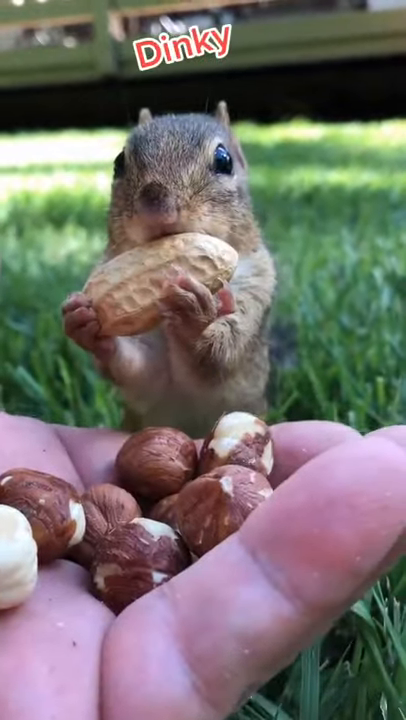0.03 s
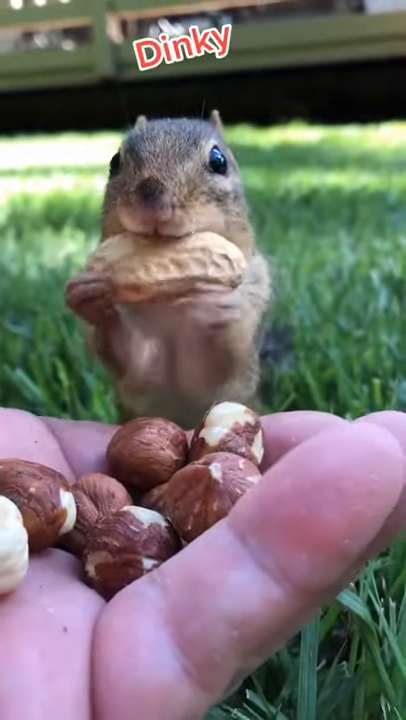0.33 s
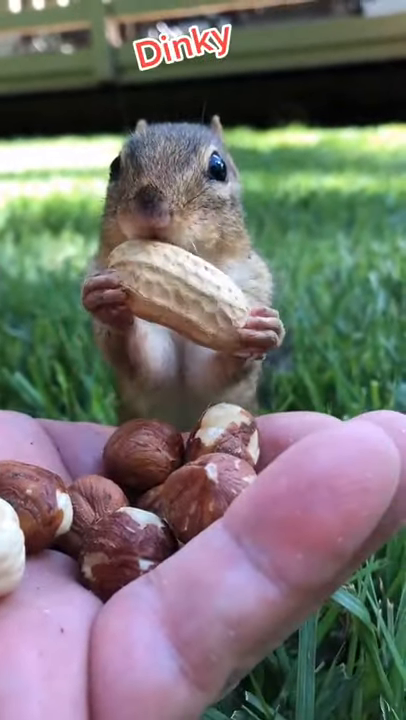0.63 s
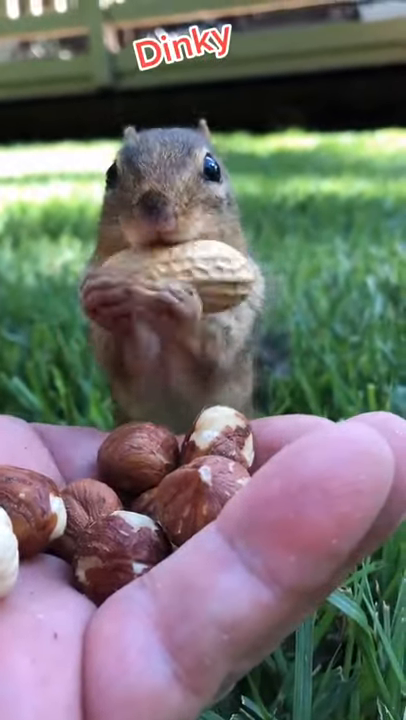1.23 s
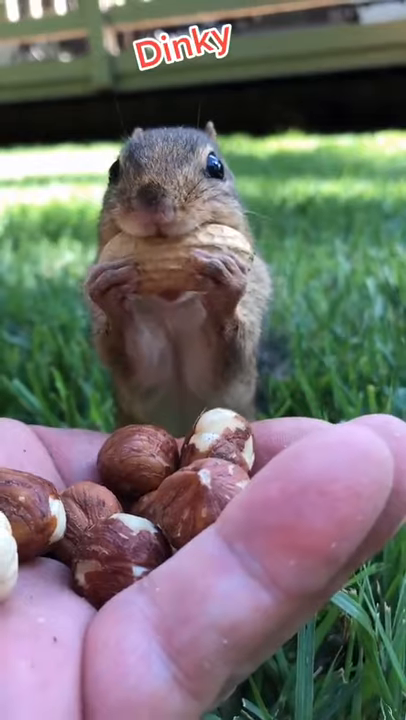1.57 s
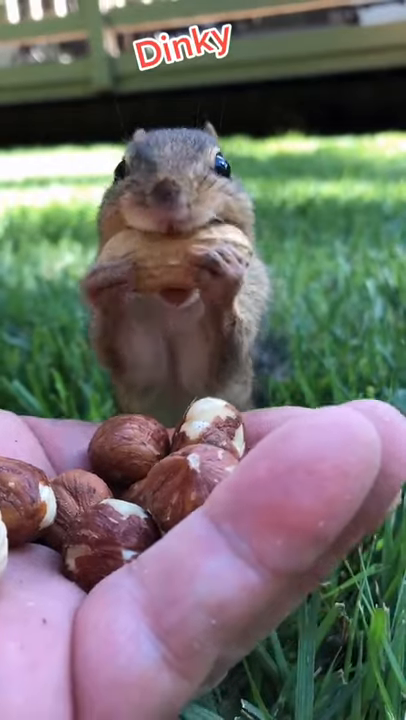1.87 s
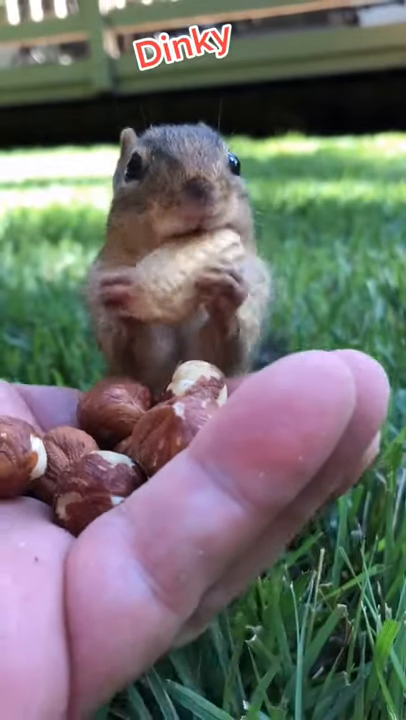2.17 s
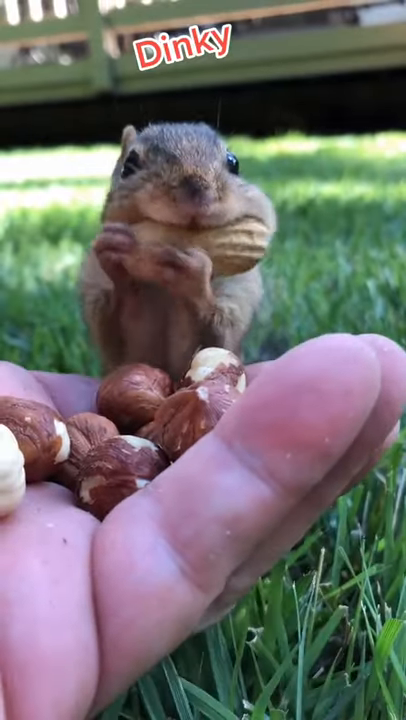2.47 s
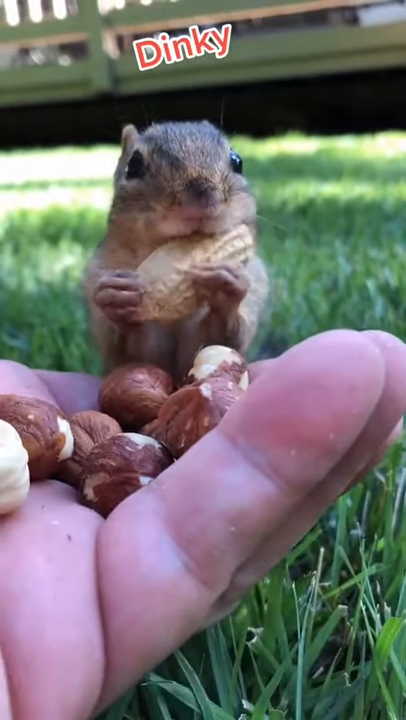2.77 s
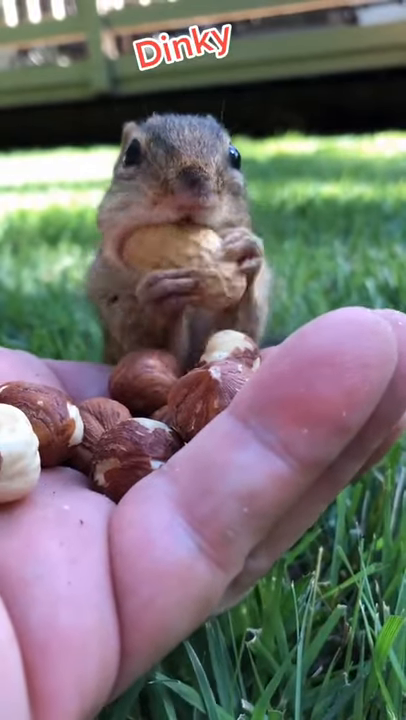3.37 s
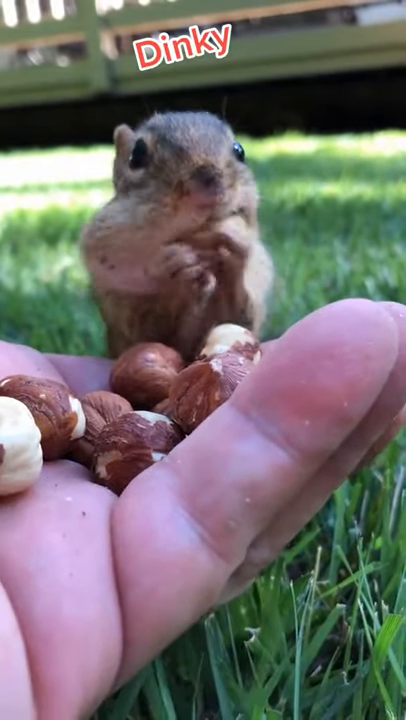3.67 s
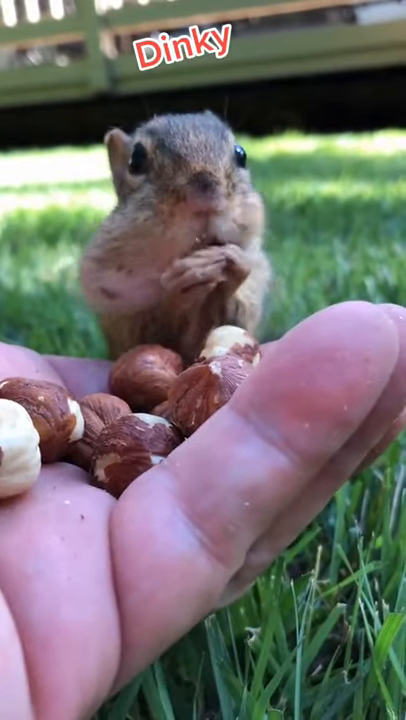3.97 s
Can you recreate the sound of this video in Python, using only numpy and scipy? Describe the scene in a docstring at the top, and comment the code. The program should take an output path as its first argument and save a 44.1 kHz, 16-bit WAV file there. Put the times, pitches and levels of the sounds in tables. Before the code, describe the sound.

A chipmunk bites and turns a peanut close to the microphone, making irregular bursts of small dry cracks and gritty scrapes, then a few tiny hollow knocks. Faint high insects and a low rumble fill the lawn behind.

```python
"""Dry cracks and short gritty scrapes: a chipmunk bites and turns a peanut, close by on a summer lawn.
Each fracture is a tick coloured by the hollow shell; sliding teeth and claws make runs of tiny slips.
Near the end the nut knocks as it is pushed into the cheek. Behind it insects sing high in the grass,
over a low outdoor rumble, a distant machine's hum and one soft swell from the hand holding the nuts."""
import sys
import numpy as np
from scipy import signal
from scipy.fft import rfft, irfft
from scipy.io import wavfile

SR = 44100
rng = np.random.default_rng(int(sys.argv[2]) if len(sys.argv) > 2 else 0)


def unload_wav(signal):
    """Save mono or channel-first audio to the path in sys.argv[1] as 16-bit WAV at rate SR, clipped to [-1, 1]."""
    wavfile.write(
        sys.argv[1],
        SR,
        np.round(np.clip(np.atleast_2d(signal).T, -1, 1) * 32767).astype(np.int16),
    )


N = 176400


def amp(db):
    """Decibels to gain."""
    return 10 ** (np.asarray(db) / 20)


def unit(x):
    """Scale to rms 1."""
    return x / np.sqrt(np.mean(x ** 2) + 1e-20)


def spectrum(points, hz):
    """Gain at hz from (frequency [Hz], level [dB]) points."""
    point_hz, db = np.transpose(points)
    return amp(np.interp(np.log(hz + 1), np.log(point_hz), db))


def shaped(x, points):
    """Zero-phase filter through (frequency [Hz], gain [dB]) points."""
    return irfft(rfft(x) * spectrum(points, np.fft.rfftfreq(N, 1 / SR)), N)


def noise(points):
    """Steady noise of the given spectral shape, rms 1."""
    return unit(shaped(rng.standard_normal(N), points))


def drift(rate_hz):
    """Random motion up to about rate_hz, rms 1."""
    lowpass = np.exp(-(np.fft.rfftfreq(N, 1 / SR) / rate_hz) ** 2)
    return unit(irfft(rfft(rng.standard_normal(N)) * lowpass, N))


def add(mix, start_s, sound):
    """Mix a sound in at start_s."""
    part = mix[max(round(start_s * SR), 0):][:len(sound)]
    part += sound[:len(part)]


# Outdoor noise: (frequency [Hz], relative density [dB])
RUMBLE_SPECTRUM = [(20, -21.5), (38, -17), (52, -3), (75, 0), (110, 1), (150, 1.5), (230, -1.5), (330, -8),
                   (500, -10), (750, -15.5), (1000, -21.5), (1600, -26), (2600, -29), (3800, -32.5),
                   (5200, -40.5), (7000, -43.5), (14000, -51.5)]


def rumble(level_db=-48):
    """Steady low outdoor noise."""
    return amp(level_db) * noise(RUMBLE_SPECTRUM)


# Treble hiss: (frequency [Hz], relative density [dB])
HISS_SPECTRUM = [(3800, -37), (4300, 0.5), (6800, 7.5), (10000, 2), (13000, -6)]


def hiss(level_db=-72):
    """Faint hiss, independent left and right."""
    return amp(level_db) * np.array([noise(HISS_SPECTRUM), noise(HISS_SPECTRUM)])


# Machine tones: (frequency [Hz], level [dB])
HUM_LINES = [(59.2, -58.5), (118.6, -59.5), (269, -59.5), (457, -75), (537, -70), (711, -71.5),
             (912, -73.5), (1067, -87), (1125, -76.5)]


def machine_hum(waver_db=3, wander_hz=1.49):
    """A far machine: each tone wavers in level and pitch."""
    hum = np.zeros(N)
    for hz, db in HUM_LINES:
        gain = amp(db + waver_db * drift(3))
        phase = 2 * np.pi * np.cumsum(hz + wander_hz * drift(6.5)) / SR
        hum += gain * unit(np.sin(phase))
    return hum


# Hand movement: (frequency [Hz], relative density [dB])
HAND_SPECTRUM = [(25, -22), (55, 3), (140, 10), (220, -13), (500, -37), (2000, -70)]


def hand_shift(middle_s=2.137, length_s=0.5, level_db=-48.5):
    """The hand holding the nuts shifts: one soft low swell."""
    swell = np.zeros(N)
    add(swell, middle_s - length_s / 2, np.hanning(int(length_s * SR)))
    return amp(level_db) * swell * noise(HAND_SPECTRUM)


# Far insects: (frequency [Hz], relative density [dB])
CHORUS_SPECTRUM = [(6000, -56.5), (6850, -19.5), (7250, -1), (7430, -5.5), (7700, 6.5), (7900, 7),
                   (8150, 7), (8400, 6.5), (8600, -5), (9000, -12), (10000, -25.5), (11500, -32),
                   (12800, -42.5), (14000, -61)]


def insect_chorus(level_db=-54.5, shimmer_db=1.7, correlation=0.89):
    """Many far insects merge into a narrow shimmering band; stereo."""
    middle = noise(CHORUS_SPECTRUM) * np.sqrt((1 + correlation) / 2)
    side = noise(CHORUS_SPECTRUM) * np.sqrt((1 - correlation) / 2)
    return amp(level_db + shimmer_db * drift(60)) * np.array([middle + side, middle - side])


# Nearest insect: (time [s], level [dB])
TRILL_LEVEL = [(0, -57), (.6, -57.5), (1.6, -57.5), (2.3, -62.5), (4, -61)]


def insect_trill(tone_hz=8308, wander_hz=14, strokes_per_s=49.3, sharpness=1.45):
    """One insect: a high tone that swells on each wing stroke."""
    stroke = np.cos(2 * np.pi * np.cumsum(strokes_per_s + .2 * drift(2)) / SR)
    tone = np.sin(2 * np.pi * np.cumsum(tone_hz + wander_hz * drift(40.7)) / SR)
    level_db = np.interp(np.arange(N) / SR, *np.transpose(TRILL_LEVEL))
    return amp(level_db) * unit(np.exp(sharpness * stroke) * tone)


def yard(direct, level_db=-18.5, t60_s=0.22):
    """Add weak short reflections from hand, ground and house wall."""
    t = np.arange(SR // 4) / SR
    tail = rng.standard_normal(len(t)) * amp(-60 * t / t60_s)
    return direct + amp(level_db) * signal.fftconvolve(direct, tail / np.linalg.norm(tail))[:N]


# Stereo width of the crackle: (frequency [Hz], side gain [dB])
SIDE_GAIN = [(3700, -78), (4400, -25), (5500, -13.5), (9000, -14), (13000, -13)]


def widen(middle, taps=97):
    """Treble arrives out of step left and right; the rest stays centred."""
    scatter = rng.standard_normal(taps) * np.hanning(taps)
    scatter = scatter - scatter[::-1]  # 90-degree shift: both sides stay equally loud
    shifted = signal.fftconvolve(middle, scatter / np.linalg.norm(scatter), "same")
    side = shaped(shifted, SIDE_GAIN)
    return np.array([middle + side, middle - side])


# Hollow shell response: (frequency [Hz], relative gain [dB])
SHELL_SPECTRUM = [(300, -13), (750, -5.5), (1150, 3.5), (1800, 1.5), (2400, -1), (3200, 3.5), (4100, 3.5),
                  (4900, -5), (6000, -32), (9000, -14), (14000, -16)]
# Sharp edge of a fracture: (frequency [Hz], relative gain [dB])
SNAP_SPECTRUM = [(1000, -33.5), (4000, -12), (5600, 6), (6700, 7), (8000, 8.5), (9800, 7), (11000, -2.5),
                 (12500, 9.5), (14000, -15.5)]


def shell_tick(centre_hz, width_oct, snap_db, size=1024):
    """One fracture through the shell: a broad, fast-dying resonance plus a treble snap."""
    hz = np.fft.rfftfreq(size, 1 / SR)
    resonance = np.exp(-.5 * (np.log2((hz + 1) / centre_hz) / width_oct) ** 2)
    body = unit(spectrum(SHELL_SPECTRUM, hz) * resonance)
    snap = amp(snap_db) * unit(spectrum(SNAP_SPECTRUM, hz))
    gain = np.hypot(body, snap)
    log_gain = np.log(np.r_[gain, gain[-2:0:-1]] + 1e-6)
    minimum_phase = np.exp(np.conj(signal.hilbert(log_gain)))  # energy packed at the onset
    return np.fft.ifft(minimum_phase).real


def slips(n, per_s, spread_db):
    """Tiny slips as random impulses of uneven size."""
    sizes = amp(spread_db * np.minimum(rng.exponential(1, n), 4))
    return sizes * rng.choice([-1, 1], n) * (rng.random(n) < per_s / SR)


def grit(n, centre_hz, snap_db, slips_per_s, spread_db, spots=6, scatter_oct=0.5, width_oct=0.53):
    """Slips at several spots on the shell, each with its own pitch; rms 1."""
    out = np.zeros(n)
    for hz in centre_hz * 2 ** (scatter_oct * rng.standard_normal(spots)):
        impulses = slips(n, slips_per_s / spots, spread_db)
        out += signal.fftconvolve(impulses, shell_tick(hz, width_oct, snap_db))[:n]
    return unit(out)


# Spells of turning the nut: (start [s], end [s], level [dB])
TURNS = [(.12, 0.402, -66.5), (0.916, 1.438, -66), (1.8, 2.588, -67.5), (2.683, 4.002, -70)]


def brushing():
    """Paws and whiskers brush the turning nut: faint fine crackle."""
    touch = np.zeros(N)
    for start_s, end_s, db in TURNS:
        add(touch, start_s, amp(db) * signal.windows.tukey(int((end_s - start_s) * SR), .2))
    return touch * grit(N, centre_hz=3320, snap_db=-3.5, slips_per_s=560, spread_db=1.5)


# Nut against the cheek: (time [s], peak [dB], pitch [ratio], top mode relative level [dB])
CHEEK_KNOCKS = [(3.7682, -40, 1.1, -12), (3.781, -39.5, 1.05, -8), (3.787, -51, 1, 2), (3.9199, -38, 1, -2),
                (3.943, -35.5, 0.967, 3.5), (3.967, -41.5, 1.02, -1)]


def knocks(t60_s=0.019):
    """Pushed into the cheek, the whole hollow nut rings in four modes."""
    out, t = np.zeros(N), np.arange(2048) / SR
    for time_s, peak_db, pitch, top_db in CHEEK_KNOCKS:
        modes = [(1250, -13), (1580, 4.5), (1880, -3), (3920, top_db)]
        ring = sum(amp(db) * np.sin(2 * np.pi * base_hz * pitch * t) for base_hz, db in modes)
        ring *= amp(-60 * t / t60_s)
        add(out, time_s, amp(peak_db) * ring / abs(ring).max())
    return out


# Strokes over the shell: (mid time [s], length [s], level at middle [dB], centre [Hz])
SCRAPE_STROKES = [(.15, .06, -58, 3160), (0.191, 0.054, -55, 3100), (0.25, 0.024, -51, 3330),
                  (0.328, 0.042, -54.5, 3180), (0.364, 0.08, -58.5, 2900), (0.956, 0.078, -58, 2700),
                  (1.049, 0.067, -53, 2900), (1.09, 0.067, -67, 2400), (1.168, 0.034, -53, 2210),
                  (1.215, 0.032, -57, 2220), (1.262, .035, -52, 4260), (1.359, .14, -69, 3400),
                  (1.839, 0.097, -64, 3200), (1.924, 0.064, -53, 2520), (1.989, 0.065, -62, 3200),
                  (2.04, 0.038, -58, 2920), (2.075, 0.043, -55, 3650), (2.16, 0.081, -65, 3200),
                  (2.285, 0.037, -53, 3600), (2.318, .025, -51.5, 2820), (2.387, 0.046, -64, 3000),
                  (2.48, 0.089, -61, 3200), (2.694, .022, -56, 3060), (2.714, 0.036, -55.5, 3360),
                  (2.741, 0.035, -58, 3230), (2.881, 0.033, -56, 2880), (2.955, .06, -61, 3430),
                  (3.05, 0.049, -61, 3270), (3.109, 0.03, -57.5, 3370), (3.268, 0.054, -61, 3200),
                  (3.353, 0.042, -53, 3340), (3.381, 0.038, -58.5, 3450), (3.475, 0.021, -55, 2870),
                  (3.514, 0.017, -52.5, 3200), (3.558, 0.043, -55.5, 3450), (3.595, .04, -61, 2800),
                  (3.697, 0.051, -55, 2500), (3.743, 0.032, -56, 2000), (3.786, .035, -59, 1800),
                  (3.892, 0.055, -57.5, 1700), (3.923, 0.022, -55, 1710), (3.968, 0.023, -57, 1700)]


def scrapes(snap_db_per_oct=13):
    """Teeth and claws slide: each stroke is a run of slips that swells and fades."""
    out = np.zeros(N)
    for middle_s, length_s, db, centre_hz in SCRAPE_STROKES:
        n = int(length_s * SR)
        snap_db = -3 + snap_db_per_oct * np.log2(centre_hz / 3320)  # higher scrapes are sharper
        stroke = grit(n, centre_hz, snap_db, slips_per_s=1100, spread_db=4)
        add(out, middle_s - length_s / 2, amp(db) * stroke * np.hanning(n))
    return out


# Shell fractures: (time [s], tick peak [dB], centre [Hz], width [oct], snap before boost [dB])
FRACTURES = [(0.1334, -38, 2500, 1.0, -20), (0.1426, -42, 3300, 1.0, -22),
             (0.1638, -32.5, 1920, 1.0, -17.5), (0.18, -42, 3150, 0.35, -9), (0.1895, -33, 4350, 0.67, -2),
             (0.1965, -33, 3300, 0.24, -22), (0.2016, -24.5, 3820, 1, -36), (0.248, -31.5, 3350, 0.19, -24),
             (0.2523, -35.5, 3350, 0.23, -22), (0.258, -42, 3450, 0.2, -19),
             (0.3264, -39.5, 3630, 0.18, -35), (0.3473, -40, 2700, 0.4, -22), (0.3597, -36, 2350, 1.0, -20),
             (0.362, -39.5, 3850, 0.15, -24), (0.3772, -36, 2300, 1.0, -19),
             (0.9262, -26.5, 1650, 1.0, -25), (0.9295, -23, 2350, 0.73, -26), (0.9445, -43, 2250, 0.8, -23),
             (0.9567, -35.5, 1600, 1.0, -20), (1.024, -30, 1580, 1.0, -15), (1.046, -37.5, 1970, 0.4, -25),
             (1.059, -31, 2230, 0.54, -19), (1.1003, -42, 1310, 0.79, -20), (1.133, -42.5, 3420, 0.2, -12),
             (1.1656, -28.5, 1920, 0.95, -17), (1.1712, -42, 1300, 0.95, -25),
             (1.1748, -39, 1300, 1.0, -16), (1.22, -40, 1300, 0.56, -16), (1.25, -38, 1350, 0.75, -14.5),
             (1.255, -35.5, 5230, 0.24, -7.5), (1.3757, -37, 3350, 0.66, -10),
             (1.8209, -41.5, 3480, 0.56, -22), (1.8623, -31.5, 2550, 0.75, -26),
             (1.8755, -31, 3750, 1.0, -12), (1.9163, -41.5, 2070, 0.42, -21),
             (2.0057, -36.5, 5350, 0.8, -7), (2.0373, -37.5, 2150, 1.0, -19),
             (2.0538, -36, 5000, 0.78, -19.5), (2.067, -31.5, 4950, 0.47, -4),
             (2.0787, -37, 4200, 1.0, -12), (2.1578, -38.5, 2050, 0.63, -19),
             (2.177, -38.5, 2950, 0.47, -11), (2.2775, -38.5, 3320, 0.3, -20),
             (2.2853, -39, 3050, 0.18, -22), (2.2902, -41, 1700, 1.0, -23),
             (2.3184, -29.5, 3080, 0.25, -25), (2.3529, -44, 3850, 0.45, -16),
             (2.4595, -42, 3100, 0.37, -21), (2.4622, -42, 3500, 1.0, -16), (2.488, -37.5, 2850, 0.78, -22),
             (2.6902, -41, 1900, 0.85, -18), (2.8213, -47.5, 3830, 0.14, -16),
             (2.8788, -42, 2300, 0.63, -23), (2.959, -43, 1300, 0.93, -14), (3.1113, -33.5, 2880, 1.0, -19),
             (3.221, -32.5, 2250, 0.85, -18), (3.3421, -35.5, 5350, 0.83, -25),
             (3.387, -39.5, 4600, 0.2, -27), (3.4782, -38.5, 2140, 0.39, -25),
             (3.5147, -41.5, 2790, 0.16, -26), (3.5961, -39, 1620, 0.62, -27),
             (3.6554, -39.5, 5350, 0.95, -11), (3.6996, -29, 2410, 0.6, -20),
             (3.7079, -40, 1800, 0.71, -18), (3.7186, -38.5, 1890, 0.3, -29),
             (3.8081, -45.5, 3150, 0.43, -17), (3.8655, -24.5, 5200, 1.0, -14),
             (3.9107, -38, 1700, 0.55, -29), (3.9888, -26, 4500, 1.0, 5)]


def cracks(snap_boost_db=5, rattle_db=-12, rattle_t60_s=0.01):
    """The bitten shell breaks: one sharp tick, then a brief rattle."""
    out, t = np.zeros(N), np.arange(2048) / SR
    for time_s, peak_db, centre_hz, width_oct, snap_db in FRACTURES:
        tick = shell_tick(centre_hz, width_oct, snap_db + snap_boost_db)
        tick /= abs(signal.hilbert(tick)).max()
        rattle = rng.standard_normal(len(t)) * amp(-60 * t / rattle_t60_s)
        rattle *= amp(rattle_db) / np.linalg.norm(rattle)
        rattle[0] = 1  # the direct tick
        add(out, time_s, amp(peak_db) * signal.fftconvolve(rattle, tick))
    return out


def scene():
    """The nut straight ahead, the garden behind it."""
    nut = widen(yard(cracks() + knocks() + scrapes() + brushing()))
    garden = insect_trill() + insect_chorus() + machine_hum() + rumble()
    return nut + garden + hand_shift() + hiss()


def record(dry):
    """Low-pass at 13.6 kHz."""
    lowpass = signal.firwin(255, 13600, window=("kaiser", 8), fs=SR)
    return signal.oaconvolve(dry, lowpass[None], "same")


dry = scene()
out = record(dry)
unload_wav(out)
```